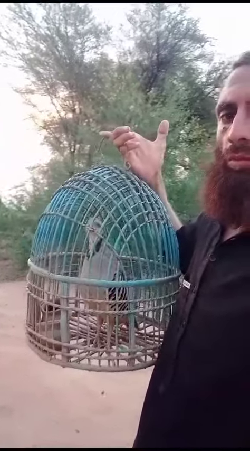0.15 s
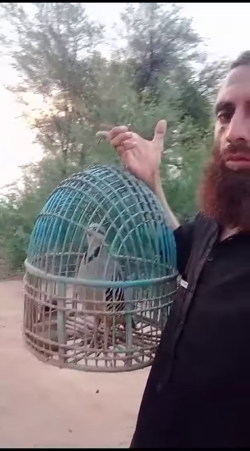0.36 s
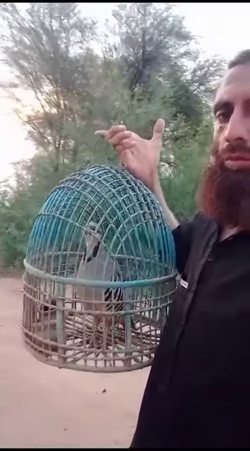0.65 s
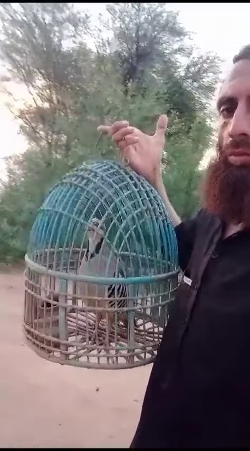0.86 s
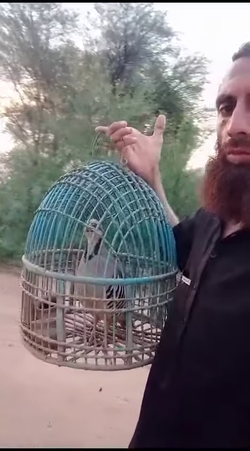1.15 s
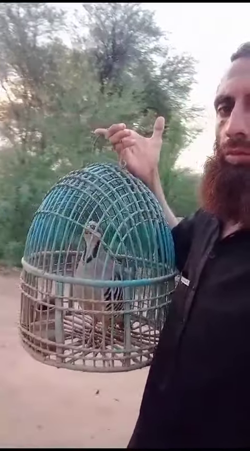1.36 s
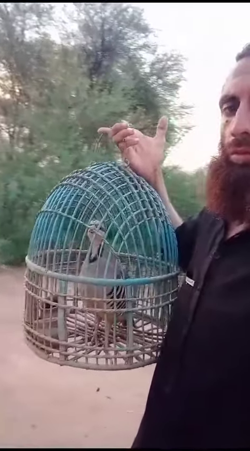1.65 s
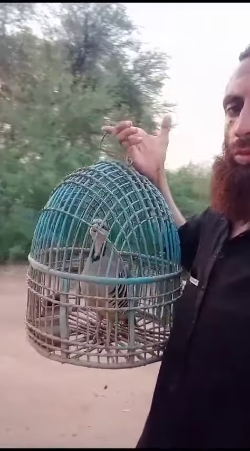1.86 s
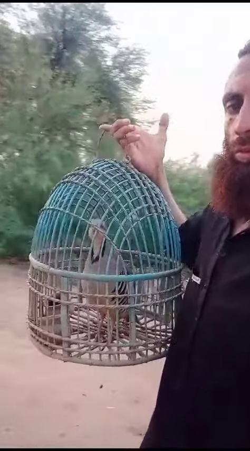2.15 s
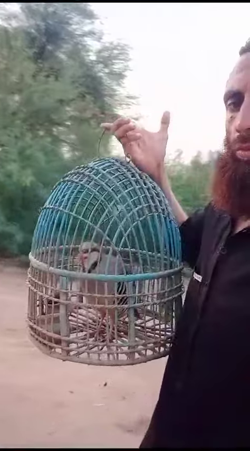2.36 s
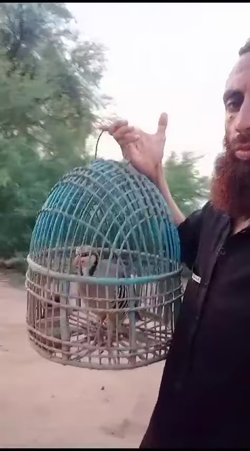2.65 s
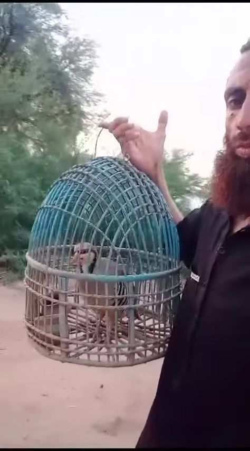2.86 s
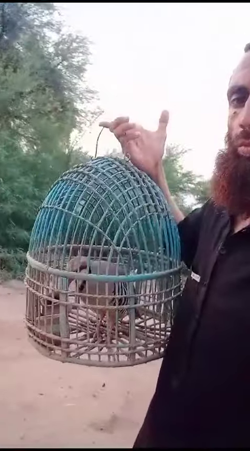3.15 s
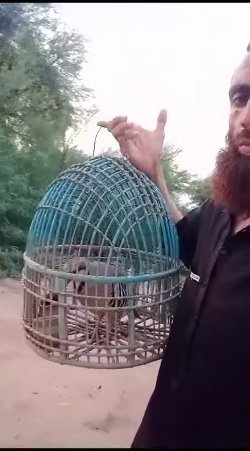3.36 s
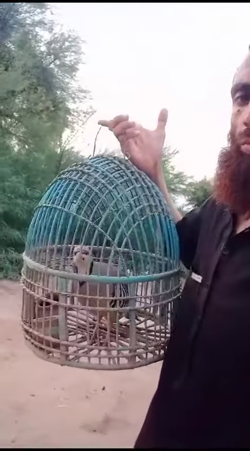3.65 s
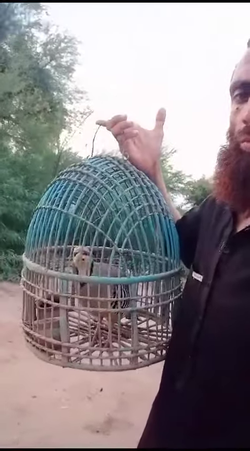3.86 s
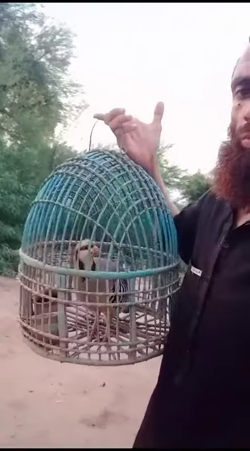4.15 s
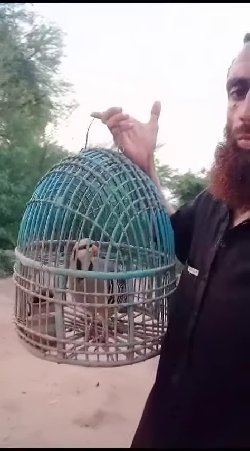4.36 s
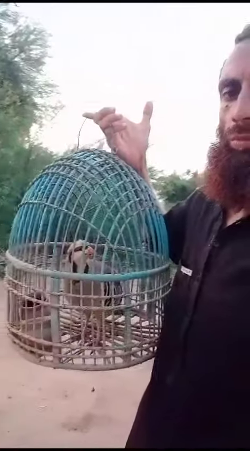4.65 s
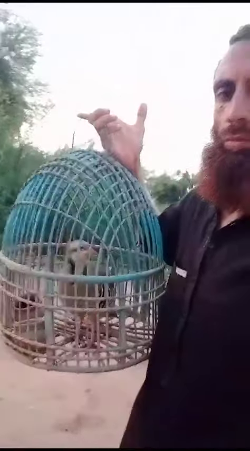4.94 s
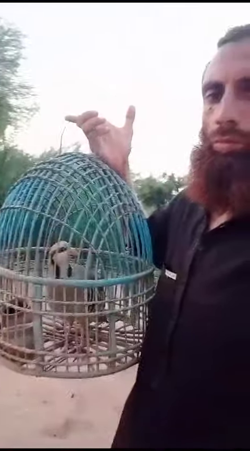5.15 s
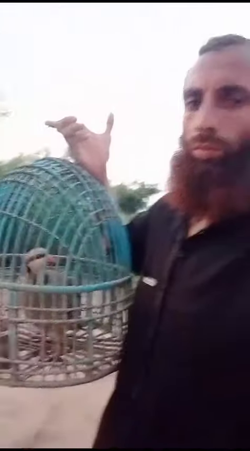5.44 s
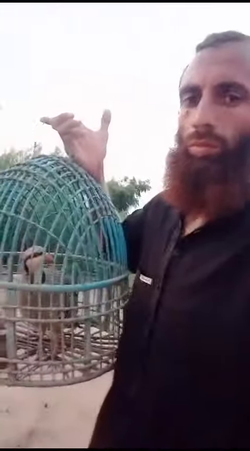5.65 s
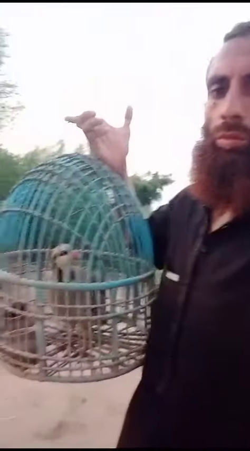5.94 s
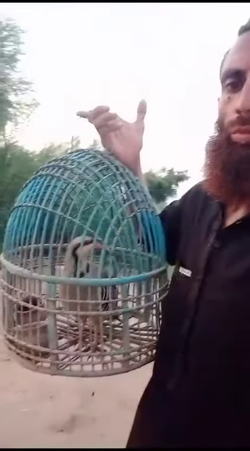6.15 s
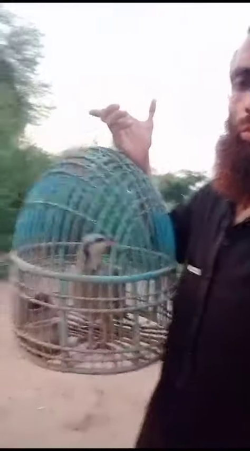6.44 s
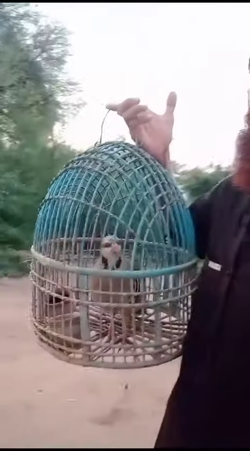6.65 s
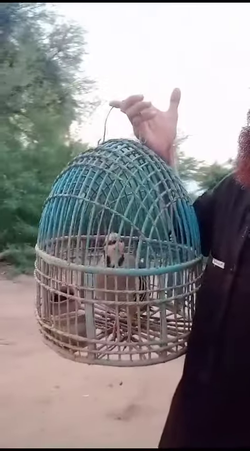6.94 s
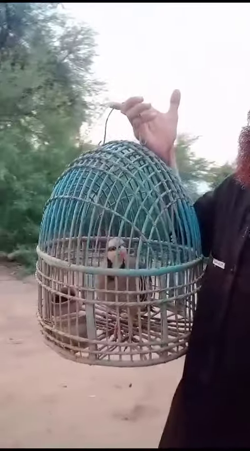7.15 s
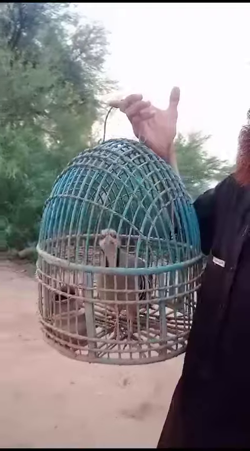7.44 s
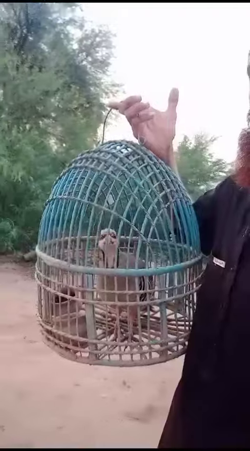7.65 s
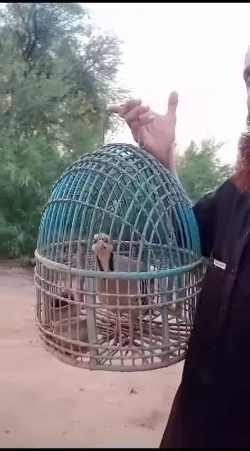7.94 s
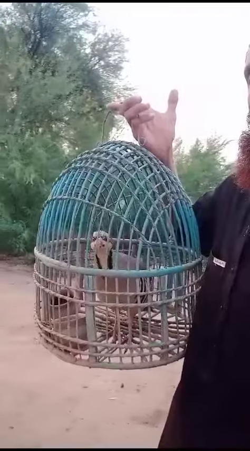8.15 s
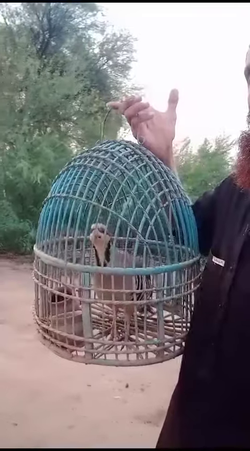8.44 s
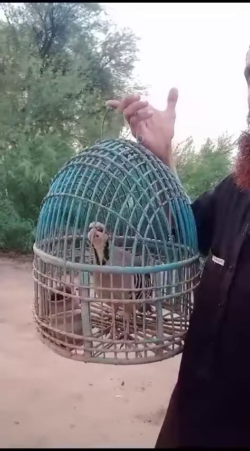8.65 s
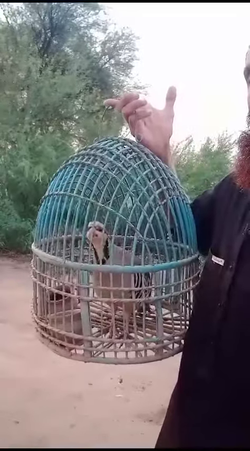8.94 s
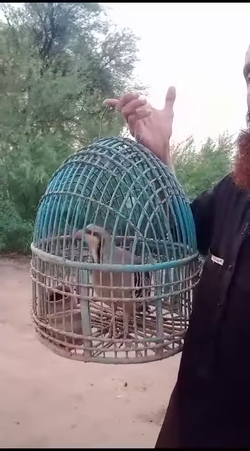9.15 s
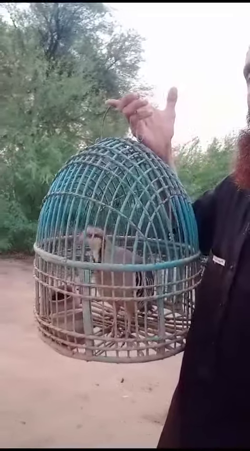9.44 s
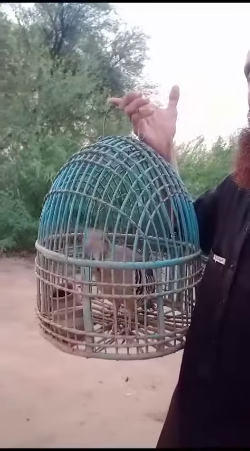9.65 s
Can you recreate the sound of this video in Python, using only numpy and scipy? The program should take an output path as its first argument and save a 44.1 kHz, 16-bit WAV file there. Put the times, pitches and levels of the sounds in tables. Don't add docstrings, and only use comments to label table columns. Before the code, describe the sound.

A quiet outdoor bed of leaf hiss, a low distant pump engine, faint bird twitter and fast insect chirps opens alone. After two seconds a close caged partridge gives three thin, falling whines, then soft, spaced clucks. They grow louder, quicker and harsher, ending in strong two-beat clucks still going at the cut. Phone microphone a step or two away, with short echo from trees.

```python
import sys
import numpy as np
from scipy import signal
from scipy.fft import rfft, irfft
from scipy.io import wavfile

SR = 44100
rng = np.random.default_rng(int(sys.argv[2]) if len(sys.argv) > 2 else 0)


def store_wav(level_fs):
    pcm = np.round(np.clip(np.atleast_2d(level_fs), -1, 1) * 32767)
    wavfile.write(sys.argv[1], SR, pcm.T.astype(np.int16))


def natural_amplitude(level_db):
    exponent = np.asarray(level_db, float) / 20
    return 10 ** exponent


N = 432180
T = np.arange(N) / SR


def wander(rate_hz, size):
    window = np.hanning(int(2 * SR / rate_hz))
    window = window / np.sqrt(np.sum(window ** 2))
    return signal.fftconvolve(rng.standard_normal(size + len(window) - 1), window, "valid")


def resonance(f, hz, width_hz, db):
    return natural_amplitude(db) / (1 + ((f - hz ** 2 / f) / width_hz) ** 2) ** 1.335


def add(out, start_s, x):
    i = int(start_s * SR)
    out[i:i + len(x)] += x[:N - i]


def echo(x, t60_s, db, gap_s=0.00067):
    t = T[:SR // 2]
    decay = natural_amplitude(-60 * t / t60_s) * np.clip((t - gap_s) / 0.0011, 0, 1)
    tail = rng.standard_normal(len(t)) * decay
    return signal.fftconvolve(x, tail * natural_amplitude(db) / np.sqrt(np.sum(tail ** 2)))[:N]


def sweep(hz, shape):
    return np.sqrt(2) * shape * np.sin(2 * np.pi * np.cumsum(hz) / SR)


# (frequency [Hz], density [dB per Hz])
AIR_SPECTRUM = [(76, -42), (130, -10.5), (162, -11.5), (322, -20), (1200, -9.5), (1900, -11), (2800, -8.5),
                (6020, -9), (6940, -10.5), (7680, -12), (8150, -76), (9200, -38), (13500, -35.5),
                (15200, -23.5), (16200, -34)]
AIR_DB = -69.5


def air():
    f = np.arange(1, N // 2 + 2) * SR / N
    hz, db = np.transpose(AIR_SPECTRUM)
    shape = natural_amplitude(np.interp(np.log(f), np.log(hz), db))
    shape = shape + resonance(f, 77.4, 62, 1.4)
    midband = (f > 150) & (f < 6200)
    rms = np.sqrt(np.sum(shape[midband] ** 2) * 2 / N)
    x = irfft(rfft(rng.standard_normal(N)) * shape / rms, N)
    return x * natural_amplitude(AIR_DB - 4 + 0.83 * wander(3.45, N))


# (time [s], level [dB])
DRONE_SWELL = [(0.0, -74), (0.4, -75.5), (0.8, -64), (1.5, -73.5), (4.3, -70.5), (5.5, -79.5), (5.85, -70),
               (6.1, -74.5), (6.4, -61), (7.3, -70), (7.55, -82), (8.0, -74.5), (8.35, -64), (8.65, -71),
               (9.55, -63), (9.8, -80)]
# (multiple of firing rate, level [dB])
DRONE_ORDERS = [(.5, -22), (1.5, -11.5), (2, -58)]
DRONE_HZ = 75
THROB_HZ, THROB_DEPTH, THROB_PEAK_S, THROB_ENDS_S = 4.3, 0.81, 0.904, 4.4


def engine():
    phase = 2 * np.pi * np.cumsum(DRONE_HZ + .5 * wander(1.92, N)) / SR
    swell_db = np.interp(T, *np.transpose(DRONE_SWELL))
    depth = THROB_DEPTH * np.clip((THROB_ENDS_S - T) / 0.27, 0, 1)
    throb = depth * np.cos(2 * np.pi * THROB_HZ * (T - THROB_PEAK_S))
    out = natural_amplitude(swell_db) * (1 + throb) * np.sin(phase)
    for k, order_db in DRONE_ORDERS:
        level_db = -68 + 0.46 * (swell_db + 64.5) + order_db + 1.9 * wander(5, N)
        out += natural_amplitude(level_db) * np.sin(k * phase)
    return np.sqrt(2) * out


# (time [s], length [s], pitch [Hz], spread [Hz], level [dB])
TWITTER = [(0.02, 0.06, 4510, 1745, -66), (0.175, 0.057, 4800, 1510, -62), (0.31, 0.038, 5690, 300, -57.5),
           (0.365, 0.032, 5230, 250, -57.5), (1.152, 0.024, 5500, 227, -66),
           (3.04, 0.039, 5540, 250, -65.5), (1.657, 0.034, 4890, 553, -62), (1.771, 0.067, 5820, 639, -67),
           (2.476, 0.028, 5530, 282, -65), (2.528, 0.046, 4050, 224.4, -65.5),
           (2.673, 0.041, 4300, 211, -66), (2.711, 0.095, 4000, 435, -71), (3.075, 0.095, 3940, 425, -62),
           (3.19, 0.053, 4500, 606, -64), (3.358, 0.072, 5700, 366.2, -64), (4.525, 0.026, 4290, 209, -63),
           (3.05, 0.061, 4780, 200, -62), (5.506, 0.075, 5500, 324.7, -64), (7.419, 0.12, 5520, 572, -57),
           (7.787, 0.046, 3820, 574, -66), (8.966, 0.014, 5540, 933, -60.5), (9.175, 0.091, 4360, 735, -64),
           (9.59, 0.13, 3930, 322.5, -58), (9.59, 0.095, 5340, 726, -59)]
# (time [s], level [dB])
WHITS = [
    (3.145, -64),
    (3.326, -62.5),
    (3.449, -64),
    (4.242, -63),
    (5.299, -62.5),
    (7.421, -60.5),
    (8.402, -63),
    (8.972, -61.5),
    (9.192, -58),
    (9.391, -68),
]


def far_birds():
    flock, whits = np.zeros((2, N))
    haze = [(9.7 * a, 0.027 + .04 * b, 3000 + 3100 * c, 250, -79 + 6 * d ** 2) for a, b, c, d in rng.random((900, 4))]
    for s, length_s, hz, spread_hz, db in TWITTER + haze:
        u = np.linspace(0, 1, int((length_s + 0.0063) * SR))
        for offset in np.linspace(-.5, .5, int(spread_hz / 350) + 3)[1:-1]:
            fall_hz = (120 + .2 * spread_hz) * (.5 - u)
            burr_hz = (50 + .08 * spread_hz) * wander(200, len(u))
            warble_hz = hz + spread_hz * 1.6 * offset + fall_hz + burr_hz
            shape = np.sin(np.pi * u) * natural_amplitude(db - 5.0 + 4.55 * wander(60, len(u)))
            add(flock, s, sweep(warble_hz, shape))
    u = np.linspace(0, 1, int(.027 * SR))
    for s, db in WHITS:
        shape = np.sin(np.pi * u ** 0.9) * natural_amplitude(db + 2 * wander(170, len(u)))
        add(whits, s, sweep(1150 + 1200 * u, shape))
    flock = natural_amplitude(1.5) * flock + echo(flock, 0.07, 0.058, gap_s=0.003)
    return flock + whits + echo(whits, 0.28, -4.5)


# (first [s], last [s])
TRILL = [(.042, .042), (.228, .359), (.446, .584), (.779, 1.358), (1.429, 2.063), (2.128, 4.037),
         (4.195, 5.741), (5.799, 6.539), (6.606, 7.761), (7.824, 8.881), (8.945, 9.755)]
INSECT_DB = -65


def insect():
    out = np.zeros(N)
    u = np.linspace(0, 1, int(.0125 * SR))
    chirp = sweep(7850 - 1600 * u, np.sin(np.pi * u ** 1.52) ** 0.5)
    times = np.concatenate([np.linspace(a, b, round((b - a) / .062) + 1) for a, b in TRILL])
    for s, (a, b) in zip(times, rng.standard_normal((len(times), 2))):
        add(out, s - .0012, chirp * natural_amplitude(INSECT_DB + 1.2 * a))
        add(out, s + .0196, chirp * u ** .2 * natural_amplitude(INSECT_DB + 1.2 * b))
    return out + echo(out, 0.19, -7)


# (frequency
# [Hz], width [Hz], level [dB])
SIDE_RINGS = [(832, 84, -17.5), (4160, 460, -34.5), (9340, 420, -46.5), (11180, 1630, -44.5),
              (15120, 300, -26)]
WINDPIPE_HZ, WINDPIPE_WIDTH_HZ, BEAK_WIDTH_HZ = 3130, 407, 532
CHEST_HZ, CHEST_WIDTH_HZ = 615, 400


def voice(level_db, pitch_hz, throat_hz, pipe_db, beak_hz, beak_db, chest_db, hoarse, whistle, width_hz,
          chest_hz=CHEST_HZ, limp=0):
    n = len(pitch_hz)
    phase = 2 * np.pi * np.cumsum(pitch_hz * (1 + .03 * hoarse * wander(200, n))) / SR
    shimmer = natural_amplitude(2.5 * hoarse * wander(250, n))
    out, power = 0, 0
    limp = limp * natural_amplitude(5 * wander(60, n))
    ring_gain = natural_amplitude(beak_db + 1.18 * (level_db.max() + 30.5))
    for k in np.r_[1:int(16000 / pitch_hz.min()), 1.5:12]:
        f = k * pitch_hz
        gain = resonance(f, throat_hz, width_hz, 0)
        gain = gain + resonance(f, chest_hz, CHEST_WIDTH_HZ, chest_db)
        gain = gain + resonance(f, WINDPIPE_HZ, WINDPIPE_WIDTH_HZ, pipe_db)
        gain = gain + resonance(f, beak_hz, BEAK_WIDTH_HZ, beak_db)
        gain = gain + ring_gain * sum(resonance(f, *ring) for ring in SIDE_RINGS)
        gain = gain * np.minimum(f / chest_hz, 1) ** 4 * (f < 16000)
        if k != 3:
            gain = gain * (1 - whistle)
        if k % 1:
            gain = gain * limp * min(k / 2.5, 1)
        rough = hoarse * min(k / 3, 1) ** 1.5
        breath = rough * (wander(456, n) + 1j * wander(397, n))
        out = out + gain * np.imag((1 - rough + breath) * np.exp(1j * (k * phase + 0.55 * k ** 2)))
        power = power + (f < 3600) * gain ** 2 * ((1 - rough) ** 2 / 2 + rough ** 2)
    fade_in = np.minimum(np.arange(n) / 90, 1)
    return out * shimmer * natural_amplitude(level_db) / np.sqrt(power) * fade_in


# (time [s], level [dB], pitch [Hz], throat [Hz])
WHINE = [
    [(2.098, -69.5, 487, 1450), (2.11, -53.5, 488, 1440), (2.145, -74, 445, 1350)],
    [(2.192, -64, 423, 1410), (2.25, -60.5, 427, 1570), (2.3, -60.5, 471, 1690), (2.338, -63.5, 431, 1434),
     (2.385, -70, 402, 1090)],
    [(2.39, -71, 328, 1010), (2.422, -57, 335, 1290), (2.45, -66, 299, 2180), (2.5, -60, 317, 1570),
     (2.57, -73.5, 304, 1110)],
]


def whine():
    out = np.zeros(N)
    for breath in WHINE:
        s, *columns = np.transpose(breath)
        t = np.arange(s[0], s[-1], 1 / SR)
        db, hz, throat_hz = (np.interp(t, s, c) for c in columns)
        add(out, s[0], voice(db, hz, throat_hz, pipe_db=-50, beak_hz=6000, beak_db=-46.5, chest_db=-45,
                             hoarse=0.32, whistle=0, width_hz=390))
    return out


ATTACK_S, ATTACK_DB, SAG_DB, RELEASE_DB_PER_S = .011, 6, 5, 1073
ACCENT_DB, ACCENT_S, WHISTLE_S = 3, 0.0057, 0.0082
SECOND_BEAT_S, SECOND_BEAT_DB, DIP_DB = .036, 4, 4
SHARP, SHARP_S, DROOP_SOFT, DROOP_LOUD = 0.1564, 0.00817, 0.22, 0.091
THROAT_HZ, THROAT_HZ_PER_DB, THROAT_SHUT_HZ = 2127, 43, 1615
THROAT_FALL, THROAT_WIDTH_HZ = 0.21, 916
WINDPIPE_DB, WINDPIPE_DB_PER_DB, WINDPIPE_SHUT_DB = -6.5, 1.2, -34
BEAK_HZ, BEAK_FALL = 6139, 0.067
CHEST_DB, CHEST_SINK, CHEST_LATE_S = -19.5, 0.15, 0.012


def cluck(s, length_s, db, hz, beak_db, full, double):
    t = np.arange(-.006, length_s + 0.027, 1 / SR)
    effort = np.clip((db + 53) / 24, 0, 1)
    progress = np.clip(t / length_s, 0, 1.6)

    def bump(at_s, width_s):
        return np.exp(-((t - at_s) / width_s) ** 2)

    again = double * bump(SECOND_BEAT_S, 0.0042)
    opening = np.clip((WHISTLE_S * 0.75 - t) / 0.0042 + 1, 0, 1)
    whistling = np.clip((0.18 + 0.52 * effort) * opening + 0.6 * again, 0, 1)
    hoarse = np.interp(effort, (0, .4, 1), (.18, .4, .31))
    rough = np.clip(hoarse * (1 - .7 * whistling + .9 * progress ** 3), 0, 1)

    level_db = db - ATTACK_DB * np.clip(1 - t / (ATTACK_S * (1.6 - effort)), 0, 1)
    level_db = level_db - 8000 * np.maximum(-t, 0)
    level_db = level_db - SAG_DB * (1.8 - effort) * np.minimum(progress, 1) ** 2
    level_db = level_db - RELEASE_DB_PER_S * np.maximum(t - length_s, 0)
    level_db = level_db + ACCENT_DB * full * bump(0.0061, ACCENT_S)
    level_db = level_db + double * SECOND_BEAT_DB * bump(SECOND_BEAT_S + .006, .006)
    level_db = level_db - double * DIP_DB * bump(SECOND_BEAT_S - .008, .007)

    sharp = (.15 + .85 * full) / (1 + np.exp((t - SHARP_S) / .0025))
    beat_width_s = np.where(t < SECOND_BEAT_S, .004, .011)
    sharp = sharp + double * 1.1 * bump(SECOND_BEAT_S, beat_width_s)
    droop = np.interp(effort, (.2, .4, 1), (.03, DROOP_SOFT, DROOP_LOUD)) * progress ** (4.5 + 3 * double)
    pitch_hz = hz * (1 + SHARP * sharp) * (1 - np.minimum(droop, .34))

    sink = np.minimum(droop + CHEST_SINK * (1 - effort) * progress ** 2, .5)
    chest_hz = CHEST_HZ + np.interp(effort, (.1, .3, .7), (260, 130, 0))
    chest_hz = chest_hz * (1 + SHARP * sharp) * (1 - sink)
    chest_db = CHEST_DB + 15 * max(1 - 1.53 * effort, 0)
    chest_db = chest_db - 12 * np.clip(1 - t / CHEST_LATE_S, 0, 1) - 9 * again
    chest_db = chest_db + (6 - 4 * effort) * np.minimum(progress, 1.2) ** 2

    throat_hz = max(THROAT_HZ + THROAT_HZ_PER_DB * (db + 29.5), THROAT_SHUT_HZ)
    throat_hz = throat_hz * (1 - THROAT_FALL * (.4 + .6 * effort) * np.minimum(progress, 1.2) ** 1.36)
    pipe_db = max(WINDPIPE_DB + WINDPIPE_DB_PER_DB * (db + 28), WINDPIPE_SHUT_DB)
    beak_hz = BEAK_HZ * (1 + 0.027 * rng.standard_normal() - BEAK_FALL * np.minimum(progress, 1.3))
    sound = voice(level_db, pitch_hz, throat_hz, pipe_db, beak_hz, beak_db, chest_db, rough, whistling,
                  width_hz=THROAT_WIDTH_HZ * (.5 + .5 * effort), chest_hz=chest_hz, limp=0.35 * effort)
    return s + t[0], sound


# (time [s], voiced length [s], level [dB], pitch [Hz], beak ring [dB])
SOFT_CLUCKS = [(2.593, 0.021, -57, 467, -6), (2.964, 0.023, -56, 449, -24), (3.298, 0.026, -51.5, 450, -11),
               (3.639, 0.029, -48, 347.7, -14.5), (3.959, 0.022, -44.5, 355.4, -12),
               (4.059, 0.039, -43.5, 448, -13.5), (4.355, 0.027, -44.5, 397, -15.5),
               (4.45, .024, -46, 506, -20), (4.689, 0.052, -43.5, 532, -18),
               (4.969, 0.026, -39.5, 574, -21), (5.163, 0.038, -39, 582, -14.5),
               (5.397, .026, -38.5, 586, -13.5), (5.6, 0.031, -37.5, 593.3, -8),
               (5.8, 0.031, -38, 580, -13.5), (5.978, 0.033, -38, 577.6, -7), (6.163, 0.035, -35, 567, -5),
               (6.335, 0.034, -33.5, 570, -5.5), (6.503, 0.035, -33, 599, -1.5),
               (6.665, 0.034, -31.5, 589.7, -3.5), (6.828, 0.035, -31, 593.5, -2),
               (6.989, 0.034, -31, 599, -0.5)]
FULL_CLUCKS = [
    (7.152, 0.033, -30, 598, -6),
    (7.308, .056, -30.5, 607.6, -5.5),
    (7.497, 0.033, -30, 603, -2.5),
    (7.874, 0.04, -29.5, 615, -4),
    (8.259, 0.036, -28, 615, -2),
]
DOUBLE_CLUCKS = [
    (7.655, 0.069, -29, 608, -4.5),
    (8.041, 0.075, -28.5, 611.3, -1.5),
    (8.428, 0.066, -28, 610, 1),
    (8.643, 0.058, -28, 599.4, 0),
    (8.842, 0.063, -27, 606, 1.5),
    (9.053, 0.06, -28, 595, 2.5),
    (9.255, 0.064, -27.5, 605.7, 2),
    (9.467, 0.06, -28, 595, 1.5),
    (9.671, 0.064, -27, 604, -2.5),
]


def partridge():
    out = whine()
    for rows, full, double in ((SOFT_CLUCKS, False, False), (FULL_CLUCKS, True, False), (DOUBLE_CLUCKS, True, True)):
        for row in rows:
            add(out, *cluck(*row, full, double))
    out = out - .8 * signal.lfilter(*signal.iirpeak(4750, 4, fs=SR), out)
    return signal.sosfilt(signal.butter(6, 310, "high", fs=SR, output="sos"), out)


def scene():
    bed = air() + engine() + far_birds() + insect()
    bird = partridge()
    bird = bird + echo(bird, 0.12, -7.5) + echo(bird, 0.25, -32.0, gap_s=0.026)
    return (bed + bird)[None]


def top_cut(x):
    return signal.sosfilt(signal.butter(12, 17110, fs=SR, output="sos"), x)


def record(dry):
    return top_cut(dry)


dry = scene()
out = record(dry)
store_wav(out)
```